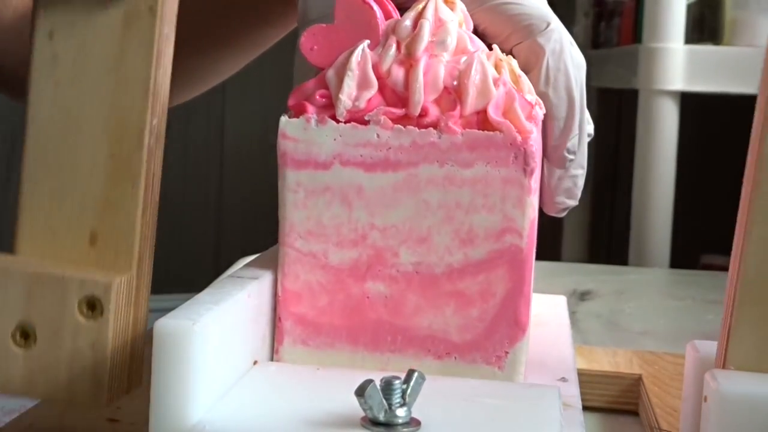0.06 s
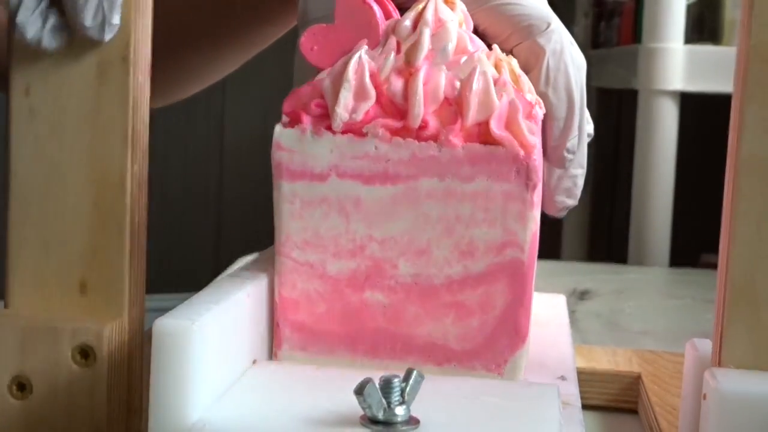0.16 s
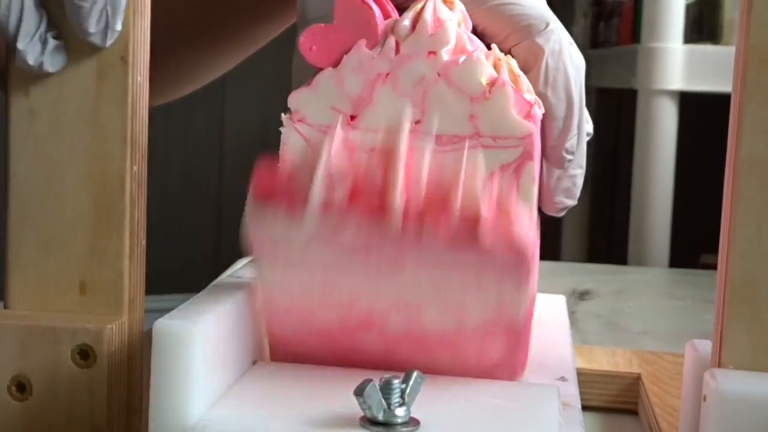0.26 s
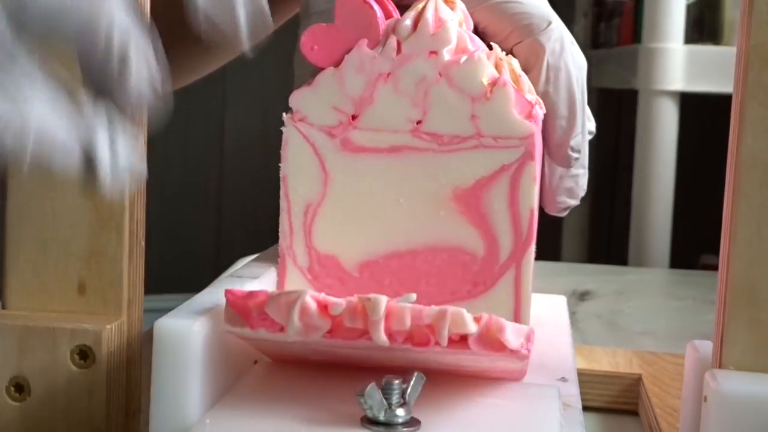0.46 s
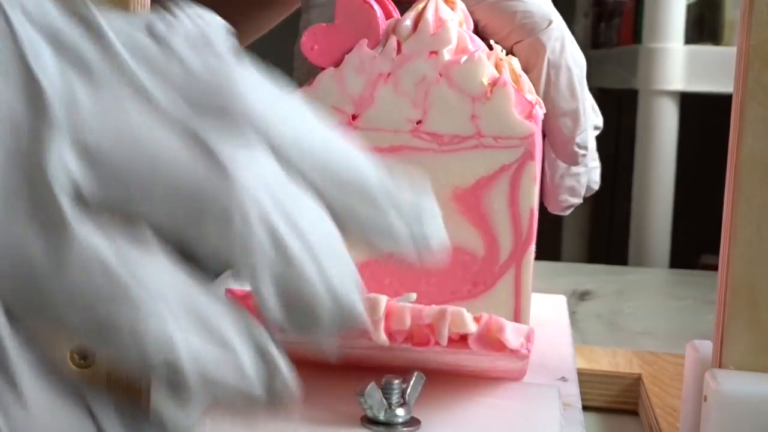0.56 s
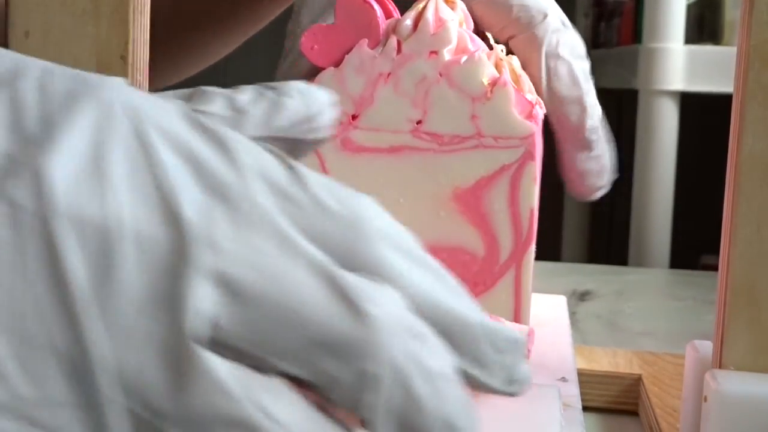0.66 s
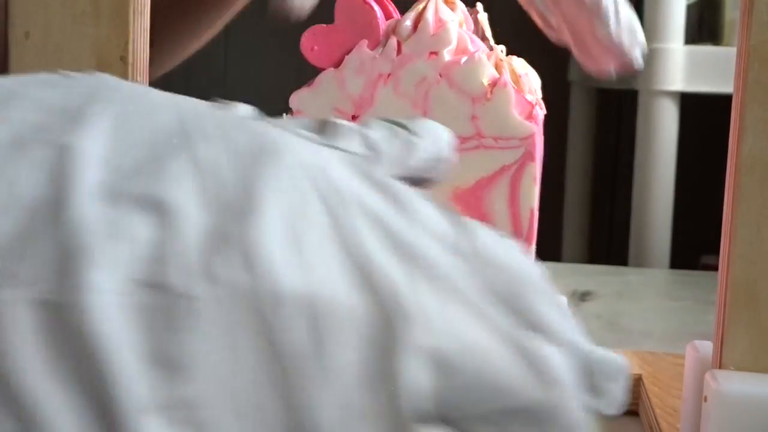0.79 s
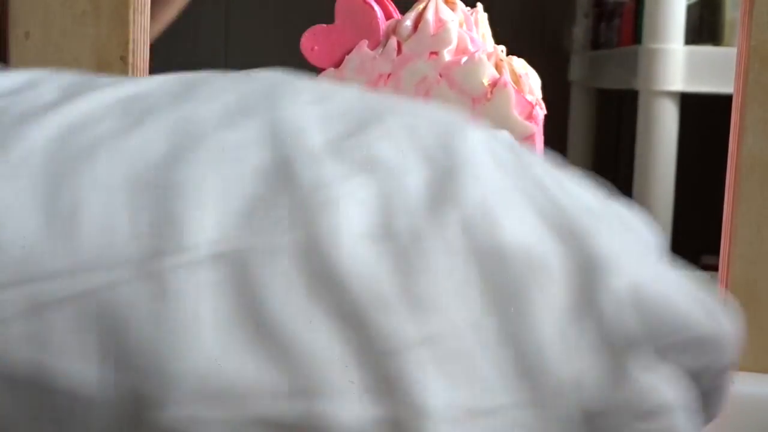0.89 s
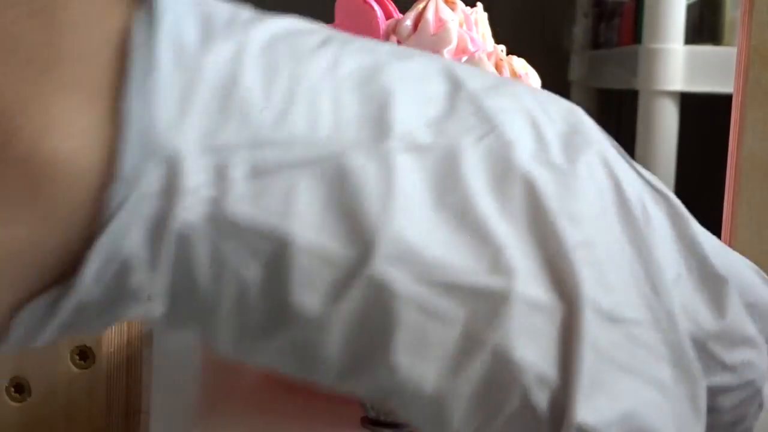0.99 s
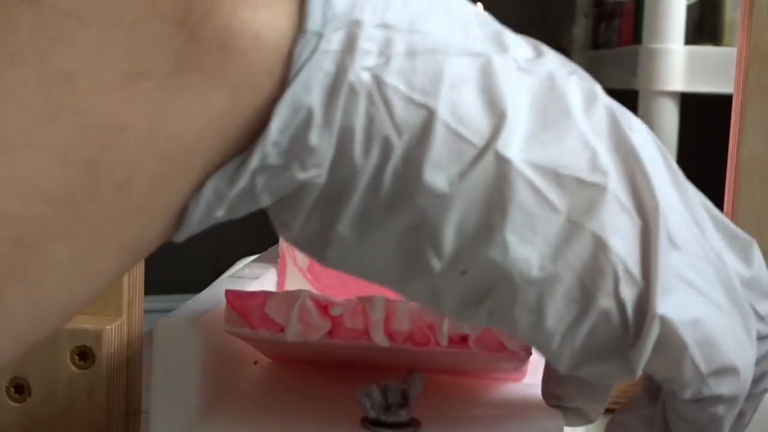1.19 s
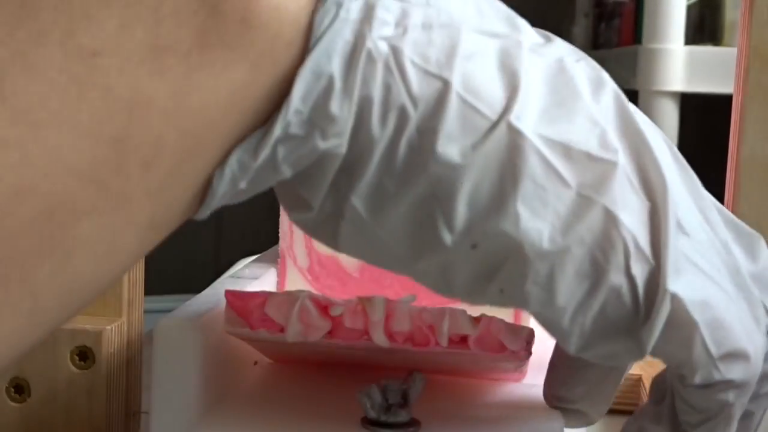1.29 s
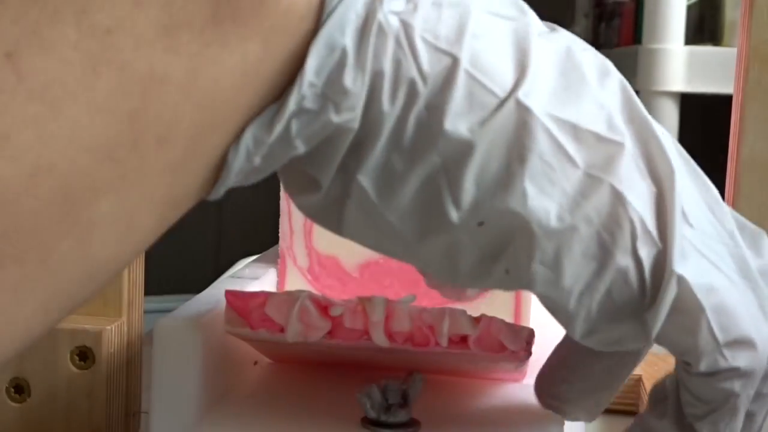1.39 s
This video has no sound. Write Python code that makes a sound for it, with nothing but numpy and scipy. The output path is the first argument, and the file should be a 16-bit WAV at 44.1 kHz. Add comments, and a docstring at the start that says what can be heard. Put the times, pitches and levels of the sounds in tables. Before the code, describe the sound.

A soap slice topples onto a plastic cutter bed with a loud clack and woody thud, gloves rustling

```python
"""Thin gloves rustle faintly, then a slice of soap topples onto a plastic cutter bed on a wooden table.
The table booms as soft pushes ring its modes; the plastic clacks and rattles as modes and noise cracks.
The gloves, made of tiny crackles, go on rustling with a faint tick and squeaks; a hand swishes past.
A small quiet room answers with echoes and a short tail, over table murmurs and a steady hush."""
import sys
import numpy as np
from scipy import signal
from scipy.fft import rfft, irfft
from scipy.io import wavfile

SR = 44100
rng = np.random.default_rng(int(sys.argv[2]) if len(sys.argv) > 2 else 0)


def decibels_to_gain(level_db):
    """Convert a level in decibels to a linear amplitude gain (20 dB per decade)."""
    exponent = np.asarray(level_db, float) / 20
    return 10 ** exponent


def log_audio(samples):
    """Write samples as a 16-bit WAV file to the path given in sys.argv[1]."""
    # one column per channel
    frames = np.atleast_2d(samples).T
    # limit to full scale, then quantise
    limited = np.clip(frames, -1, 1)
    pcm = np.round(limited * 32767).astype(np.int16)
    wavfile.write(sys.argv[1], SR, pcm)


N = 63945

# modes of the wooden table: (frequency [Hz], level [dB], t60 [s])
TABLE_MODES = [(96, -30, 0.035), (119.7, -3, .17), (131.55, 2, 0.2), (162.3, -17, 0.3), (225.3, -11, 0.27),
               (260.1, -9.5, 0.24), (339.8, -2, 0.14), (359.8, -8, 0.1), (476.2, -9, 0.13),
               (567, -20, 0.24), (607.2, -12.5, 0.25), (658.6, -8, 0.12), (735.7, -11.5, 0.18),
               (769, -8, 0.05)]
# thuds into the table:
# (time [s], level [dB], contact [ms], damping of earlier ringing [dB], level of deepest modes [dB])
THUDS = [(0.0813, -25.5, 1.64, 0, -1), (.2190, -1.5, 1.36, -2, 1), (0.2476, -14, 0.51, -18, -27),
         (.2615, -8, 1.12, -1.5, -8), (0.2779, -14.5, 1.18, 0, -8), (0.311, -22.5, 0.56, -12, -4),
         (.3400, -33.5, 1.1, -2.5, 4), (0.3794, -18.5, 2.34, -25, -11), (0.4108, -19, 4.76, 0, -20),
         (1.172, -47.5, 2.1, -2, 5), (1.195, -43, 3.9, -2, -27)]
DEEP_MODES = 2  # the lowest modes, which a blow near their still line barely moves
TABLE_SWELL_CYCLES, DAMP_S = 0.83, 0.0062

# modes of the plastic bed: (frequency [Hz], level [dB], t60 [s])
BED_MODES = [(960, -4, 0.01), (1198, -15, 0.018), (1458, -2, 0.012), (1835, -3, 0.043), (1905, -9, 0.025),
             (2300, -5, 0.031), (2522, -9, 0.09), (2777, 0.5, 0.033), (3024, 0.5, 0.031),
             (3337, 1.5, 0.017), (3720, -2, 0.012), (4130, -1, 0.01), (5153, -13.5, 0.042),
             (5690, -13.5, 0.035)]
# clacks on the bed: (time [s], ring level [dB], crack level [dB], brightness [dB per octave])
CLACKS = [(0.0809, -37, -56, -8), (0.2178, -19.5, -14, 1.5), (0.231, -28.5, -26, 3.5),
          (0.2468, -12, -12, -4), (.2500, -17.5, -21.5, -2), (.2540, -17, -21.5, -5.5),
          (.2590, -16, -16.5, -7), (.2650, -17, -15.5, -4.5), (.2860, -23, -20, -2),
          (0.3786, -31, -34.5, -9.5), (0.392, -44.5, -46, -16.5), (1.1650, -53.5, -56, -11),
          (1.177, -51, -52, -9)]
# colour of the crack noise: (frequency [Hz], density [dB per Hz])
CRACK_TONE = [(180, -26), (300, -10), (689, -28.5), (1170, -15.5), (2740, -18), (5800, -33), (9710, -34),
              (11100, -44), (16000, -52)]
CRACK_T60_S, CRACK_RISE_S = 0.034, 0.0021
STRIKE_S, DETUNE_SPREAD = 0.0012, 0.012  # chatter time; mode detuning as a fraction of frequency
BUZZ_DEPTH, BUZZ_HZ, BUZZ_RISE_S = 0.6, 90, 0.006  # loose parts make the ringing waver

# rustle of gloves and sliding soap, in passages: (time [s], level [dB], treble lift and equal bass cut [dB])
RUSTLE = [
    [(0.0, -42.5, 3), (0.054, -51.5, 8), (0.084, -47, 3.5), (0.088, -49, 6.5), (0.205, -51, 4)],
    [(0.41, -59.5, 5), (0.45, -49, 4.5), (0.546, -58, -3.5), (0.598, -51.5, 2.5), (0.612, -64, -5),
     (0.666, -57, 3), (0.882, -61, 3.5), (1.16, -58, 6.5), (1.176, -52.5, -3.5), (1.234, -65.5, -5),
     (1.414, -60, 2), (1.45, -69, 13)],
]
# colour of the rustle: (frequency [Hz], density [dB per Hz])
RUSTLE_TONE = [(88, -14), (150, 0.5), (414, -1), (484, -8.5), (979, -7.5), (1170, -9), (3490, -15),
               (13400, -25), (16000, -75)]
GRAINS_PER_S, GRAIN_SPREAD_DB = 2900, 3.0
TICK_S, TICK_DB, TICK_HZ, TICK_CYCLES = 0.75, -28, 5760, 1.2
# squeaks of glove on soap: (start [s], length [s], start pitch [Hz], end pitch [Hz], level [dB])
SQUEAKS = [(0.627, 0.095, 3257, 3290, -55.5), (0.702, 0.057, 3450, 3375, -64),
           (1.326, 0.0353, 2300, 2950, -59.5), (1.352, .045, 3000, 3283, -56.5)]
SQUEAK_POLE_WIDTH_HZ = 200

# colour of the swish, a hand sweeping past with air and glove film: (frequency [Hz], density [dB per Hz])
SWISH_TONE = [(1760, -26), (3000, -20), (3450, -1.5), (5750, 6), (6480, -0.5), (16000, -10)]
SWISH_S, SWISH_RISE_S, SWISH_FALL_S, SWISH_DB = 0.399, 0.03, 0.047, -42.5

# hands shifting on the table, in passages: (time [s], level [dB])
RUMBLE = [
    [(0.0, -76), (0.026, -53), (0.064, -50), (0.07, -51.5)],
    [(0.52, -51), (0.918, -64), (0.93, -86), (1.066, -76), (1.078, -62), (1.15, -79)],
    [(1.3, -64), (1.332, -61), (1.366, -76), (1.4, -58), (1.45, -78)],
]

# first echoes off nearby walls: (side [0 left, 1 right], delay [s], level [dB])
ECHOES = [(0, 0.0023, -9), (1, 0.0028, -21), (0, 0.00573, -15), (1, .0051, -13)]
# room decay: (frequency [Hz], t60 [s])
ROOM_DECAY = [(100, 0.44), (300, 0.37), (1000, 0.29), (3000, 0.25), (6000, 0.34), (12000, 0.11)]
ROOM_TABLE_SEND_DB, ROOM_BED_SEND_DB, ROOM_GLOVE_SEND_DB = -10, -1, -0.5
ROOM_LOW_HZ = 194  # the small room returns little below this
ROOM_SHARED, ROOM_SHARED_HZ = 0.75, 3000  # how far the sides agree, and up to where

# colour of the hush: (frequency [Hz], density [dB per Hz])
HUSH_TONE = [(12, -45), (20, 11.5), (263, -18), (329, -3.5), (577, -6.5), (1490, -6), (1720, -5.5),
             (1870, -5.5), (2340, -5.5), (6790, -7), (13300, -15), (16200, -58)]
HUSH_DB = -49.5
# stereo likeness of the hush: (frequency [Hz], left-right correlation [-1 to 1])
HUSH_LIKENESS = [(60, 0.99), (180, 0.96), (550, 0.51), (1650, 0.46), (4970, -0.13), (15000, -0.23)]

TABLE_PAN_DB, BED_PAN_DB = -2.6, -0.4  # left over right
MIC_LOW_HZ, CEILING = 54, 1.05


def evened(x):
    """Scales to rms 1."""
    return x / np.sqrt(np.mean(x ** 2) + 1e-20)


def read(points, hz):
    """Reads a table on a log-frequency axis."""
    f, value = np.transpose(points)
    return np.interp(np.log(hz + 1), np.log(f + 1), value)


def add(mix, s, sound):
    """Mixes a sound in at a time."""
    part = mix[round(s * SR):][:len(sound)]
    part += sound[:len(part)]


def colour(x, spectrum):
    """Filters by a spectrum table."""
    size = x.shape[-1]
    return irfft(rfft(x) * decibels_to_gain(read(spectrum, np.fft.rfftfreq(size, 1 / SR))), size)


def filtered(x, hz, kind="low"):
    """Second-order low or high pass."""
    return signal.sosfilt(signal.butter(2, hz, kind, fs=SR, output="sos"), x)


def ring(modes, tilt_db=0, swell_cycles=0.16, detune=None):
    """Sum of sines that swell quickly and die away; tilt is in dB per octave around 2 kHz."""
    t = np.arange(SR // 2) / SR
    detune = np.ones(len(modes)) if detune is None else detune
    out = np.zeros(len(t))
    for (hz, db, t60), ratio in zip(modes, detune):
        decay = decibels_to_gain(db + tilt_db * np.log2(hz / 2000) - 60 * t / t60)
        swell = 1 - np.exp(-t * hz / swell_cycles)
        out += decay * swell * np.sin(2 * np.pi * hz * ratio * t)
    return out


def pan(x, db):
    """Places a sound left (positive) or right (negative) by a level difference."""
    return x * decibels_to_gain(np.array([[db / 2], [-db / 2]]))


def table():
    """Soft half-sine pushes set the wooden modes ringing; a new contact damps what still rings."""
    out, t = np.zeros(N), np.arange(N) / SR
    deep = ring(TABLE_MODES[:DEEP_MODES], swell_cycles=TABLE_SWELL_CYCLES)
    upper = ring(TABLE_MODES[DEEP_MODES:], swell_cycles=TABLE_SWELL_CYCLES)
    for s, db, contact_ms, damp_db, deep_db in THUDS:
        push = np.sin(np.pi * np.clip(np.arange(400) / SR / (contact_ms / 1000), 0, 1))
        out = out * decibels_to_gain(min(damp_db, 0) * np.clip((t - s) / DAMP_S, 0, 1))
        boom = signal.fftconvolve(push / push.sum(), upper + decibels_to_gain(deep_db) * deep)
        add(out, s, decibels_to_gain(db) * boom)
    return out


def bed():
    """Each clack chatters for a moment into the plastic's modes, which waver, with a crack of noise."""
    out, t = np.zeros(N), np.arange(4096) / SR
    noises = rng.standard_normal((len(CLACKS), 3, SR // 2))
    buzz_rise = np.minimum(np.arange(SR // 2) / SR / BUZZ_RISE_S, 1)
    for (s, ring_db, crack_db, tilt_db), noise in zip(CLACKS, noises):
        strike = t[:800] / STRIKE_S
        chatter = noise[1, :800] * strike * np.exp(-3 * strike)
        # filtered backwards, so the waver is already under way at the strike
        waver = evened(filtered(noise[2, ::-1], BUZZ_HZ)[::-1])
        rung = ring(BED_MODES, tilt_db, detune=1 + DETUNE_SPREAD * noise[0, :len(BED_MODES)])
        rung = rung * (1 + BUZZ_DEPTH * waver * buzz_rise)
        add(out, s, decibels_to_gain(ring_db) * signal.fftconvolve(chatter / np.linalg.norm(chatter), rung))
        tone = [(hz, db + tilt_db * np.log2(hz / 2000)) for hz, db in CRACK_TONE]
        crack = evened(colour(noise[0, :4096], tone))
        crack_shape = decibels_to_gain(crack_db - 60 * t / CRACK_T60_S) * np.minimum(t / CRACK_RISE_S, 1)
        add(out, s, crack_shape * crack)
    return out


def rustle():
    """Dense tiny crackles of random size follow the hand's motion in level and brightness."""
    rows, t = np.array([row for part in RUSTLE for row in part]), np.arange(N) / SR
    size = decibels_to_gain(GRAIN_SPREAD_DB * np.minimum(rng.exponential(1, N), 4))
    sign = rng.choice([-1, 1], N)
    present = rng.random(N) < GRAINS_PER_S / SR
    grains = evened(colour(size * sign * present, RUSTLE_TONE))
    low = filtered(grains, 3000)
    level = decibels_to_gain(np.interp(t, rows[:, 0], rows[:, 1]))
    lift = decibels_to_gain(np.interp(t, rows[:, 0], rows[:, 2]))
    return level * (low / lift + (grains - low) * lift)


def tick():
    """One short sine whose envelope leaps up and dies within a few cycles."""
    turns = np.arange(600) * TICK_HZ / SR
    shape = np.e * turns / TICK_CYCLES * np.exp(-turns / TICK_CYCLES)
    return decibels_to_gain(TICK_DB) * shape * np.sin(2 * np.pi * turns)


def squeak(length, hz0, hz1, db, noise):
    """Stick and slip as a narrow noise band that glides in pitch."""
    u = np.clip(np.arange(8000) / SR / length, 0, 1)
    r = np.exp(-np.pi * SQUEAK_POLE_WIDTH_HZ / SR)
    slip = signal.lfilter([1], [1, -2 * r, r * r], noise[0] + 1j * noise[1])
    glide = np.exp(2j * np.pi * np.cumsum(hz0 + (hz1 - hz0) * u) / SR)
    return decibels_to_gain(db) * np.sqrt(np.sin(np.pi * u).clip(0)) * evened((slip * glide).real)


def gloves():
    """Glove film crackles as it moves, ticks once and squeaks on the soap."""
    out = rustle()
    add(out, TICK_S, tick())
    noises = rng.standard_normal((len(SQUEAKS), 2, 8000))
    for (s, length, hz0, hz1, db), noise in zip(SQUEAKS, noises):
        add(out, s, squeak(length, hz0, hz1, db, noise))
    return out


def swish():
    """A short wide sweep of treble noise."""
    t = np.arange(N) / SR - SWISH_S
    fall = np.exp(-np.clip(t - SWISH_RISE_S, 0, None) ** 2 / SWISH_FALL_S ** 2)
    shape = np.clip(t / SWISH_RISE_S, 0, 1) * fall
    noise = evened(colour(rng.standard_normal((2, N + 1)), SWISH_TONE))[:, :N]
    return decibels_to_gain(SWISH_DB) * shape * noise


def rumble():
    """Random small pushes of the hands keep the table murmuring."""
    rows = np.array([row for part in RUMBLE for row in part])
    pushes = rng.standard_normal(N + SR)
    murmur = evened(signal.fftconvolve(pushes, ring(TABLE_MODES))[SR:SR + N])
    return murmur * decibels_to_gain(np.interp(np.arange(N) / SR, rows[:, 0], rows[:, 1]))


def echoes(x):
    """A few single early reflections, without deep bass."""
    out, thin = np.zeros((2, N)), filtered(x, ROOM_LOW_HZ, "high")
    for side, s, db in ECHOES:
        add(out[round(side)], s, decibels_to_gain(db) * thin)
    return out


def room(x):
    """Sparse random reflections, each band dying at its own speed."""
    taps = np.zeros((2, SR))
    # one reflection per side in every 20 samples
    at = np.arange(150, SR - 20, 20) + rng.integers(0, 20, (2, (SR - 151) // 20))
    sign = rng.choice([-1., 1.], at.shape)
    np.put_along_axis(taps, at, sign, 1)
    # draw the right side's lows towards the left's
    taps[1] += ROOM_SHARED * filtered(taps[0] - taps[1], ROOM_SHARED_HZ)
    hz, t, z = signal.stft(taps, SR, nperseg=256)
    decay = decibels_to_gain(-60 * t / read(ROOM_DECAY, hz)[:, None])
    tail = signal.istft(z * decay, SR, nperseg=256)[1]
    return signal.fftconvolve(x[None], tail / np.linalg.norm(tail[0]), axes=1)[:, :N]


def hush():
    """Steady air and microphone noise, partly shared by both sides."""
    a, b = rfft(rng.standard_normal((2, N)))
    hz = np.fft.rfftfreq(N, 1 / SR)
    same = np.clip(read(HUSH_LIKENESS, hz), -1, 1)
    sides = np.array([a, same * a + np.sqrt(1 - same ** 2) * b])
    return decibels_to_gain(HUSH_DB) * evened(irfft(sides * decibels_to_gain(read(HUSH_TONE, hz)), N))


def scene():
    """All sources, their room and the hush."""
    wood, plastic, hands = table(), bed(), gloves()
    sent = decibels_to_gain(ROOM_TABLE_SEND_DB) * filtered(wood, ROOM_LOW_HZ, "high")
    sent = sent + decibels_to_gain(ROOM_BED_SEND_DB) * plastic + decibels_to_gain(ROOM_GLOVE_SEND_DB) * hands
    wet = pan(0.85, BED_PAN_DB) * room(sent)
    near = pan(wood, TABLE_PAN_DB) + pan(plastic, BED_PAN_DB) + hands + echoes(wood)
    return near + wet + swish() + rumble() + hush()


def top_cut(x):
    """Nothing passes above the cut-off."""
    return signal.sosfilt(signal.butter(12, 16320, fs=SR, output="sos"), x)


def record(dry):
    """The microphone drops the deep bass and the input saturates softly."""
    heard = filtered(dry, MIC_LOW_HZ, "high")
    mix = CEILING * np.tanh(heard / CEILING)
    return top_cut(mix)


dry = scene()
out = record(dry)
log_audio(out)
```